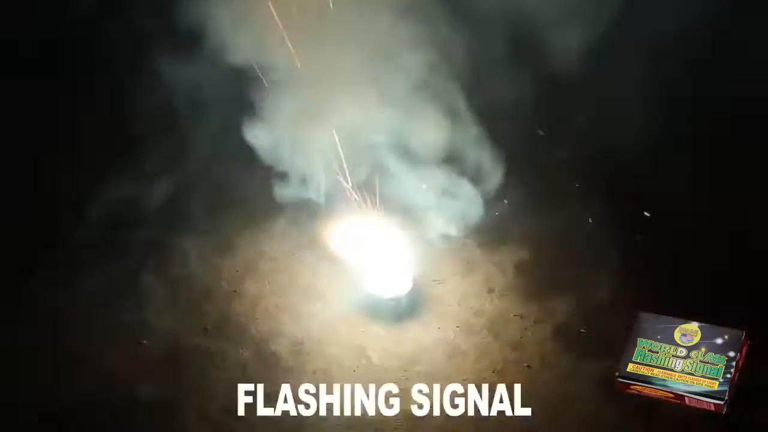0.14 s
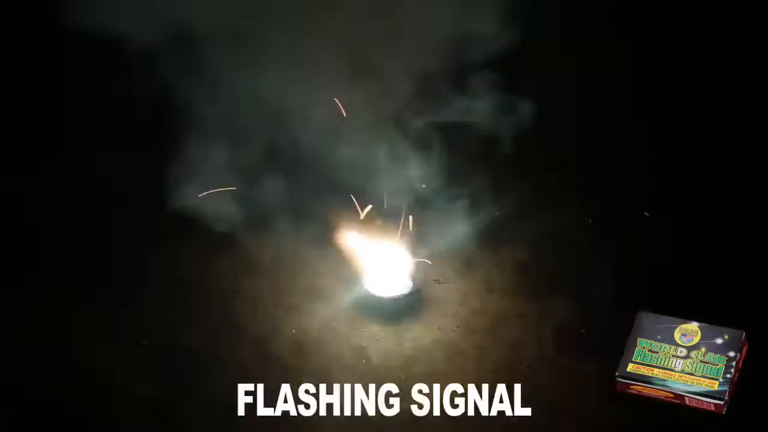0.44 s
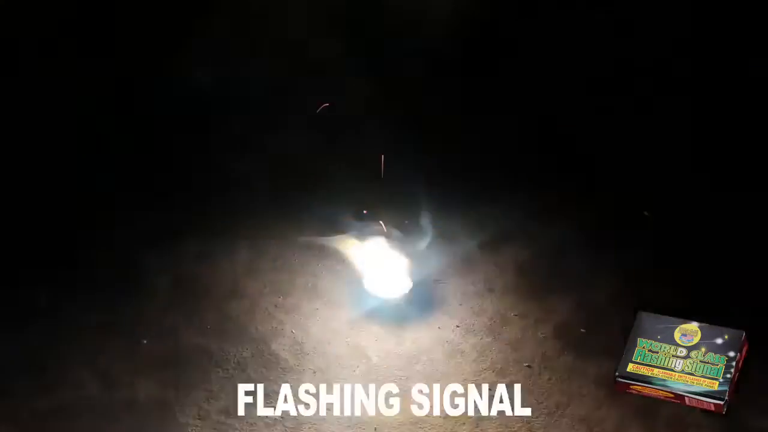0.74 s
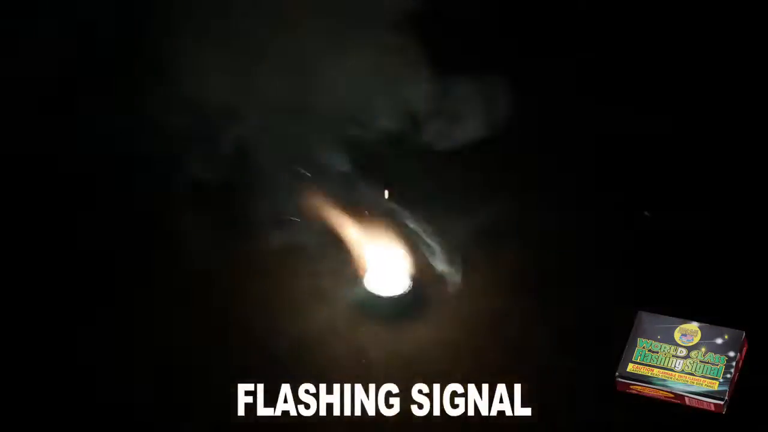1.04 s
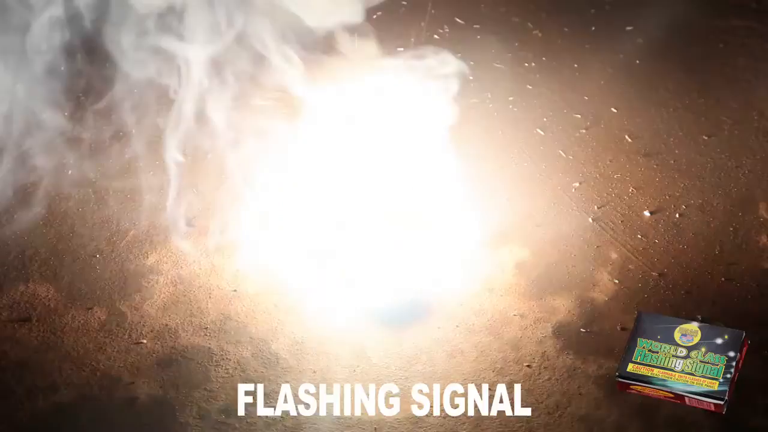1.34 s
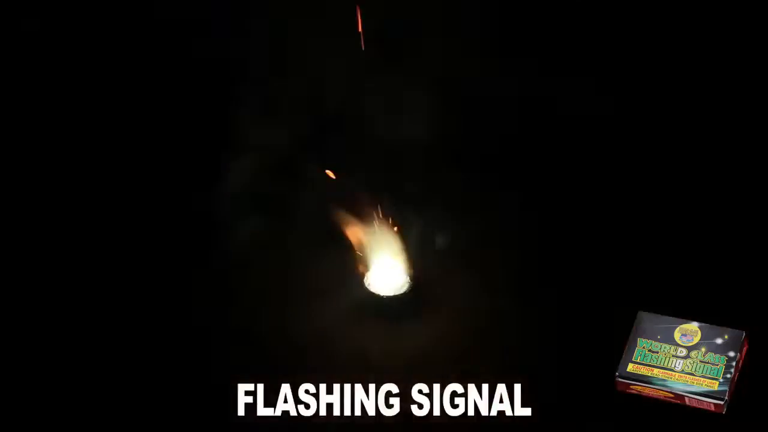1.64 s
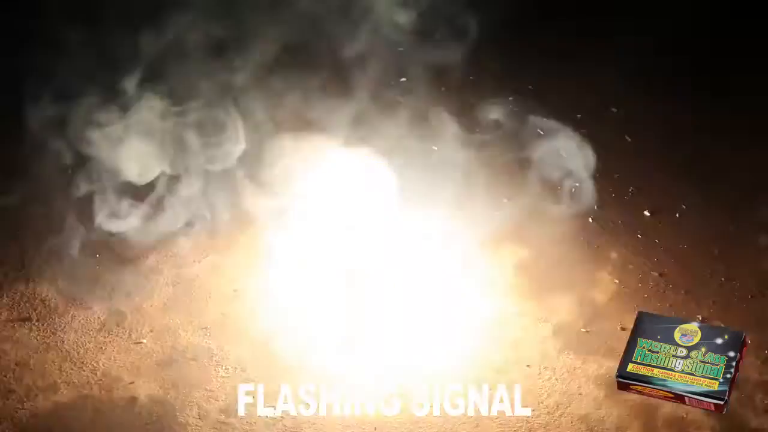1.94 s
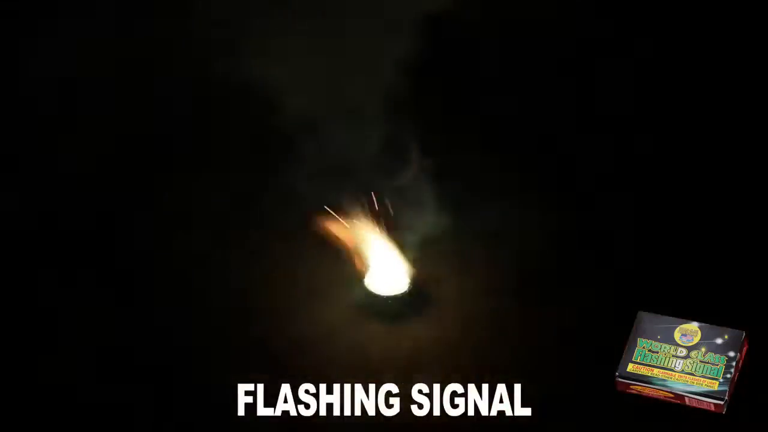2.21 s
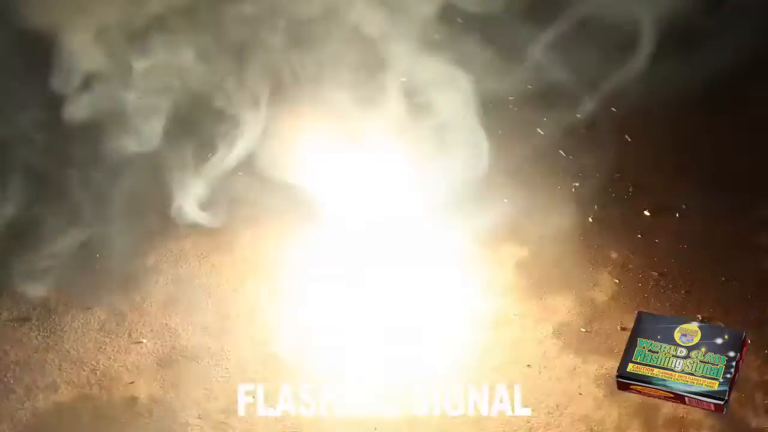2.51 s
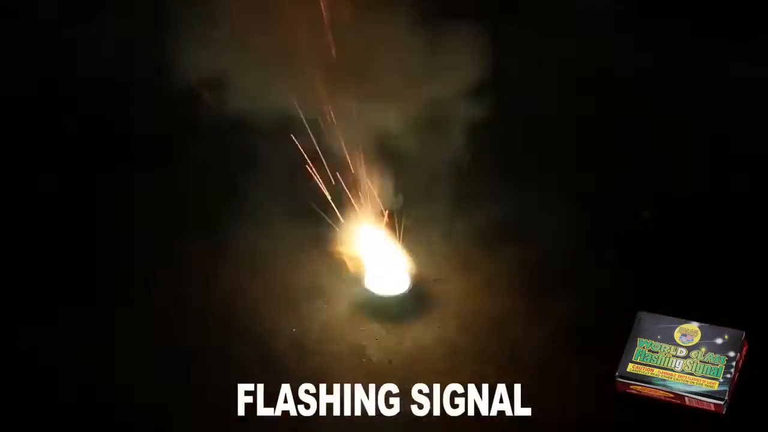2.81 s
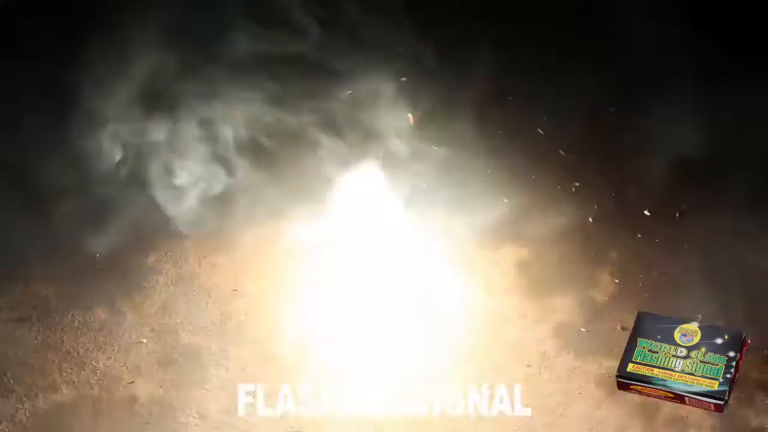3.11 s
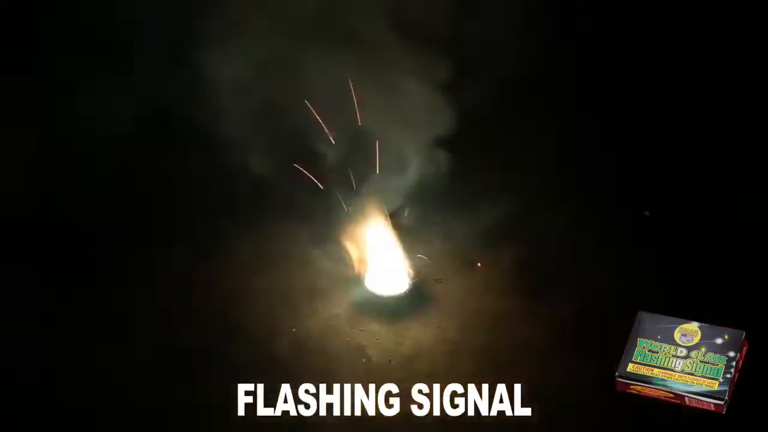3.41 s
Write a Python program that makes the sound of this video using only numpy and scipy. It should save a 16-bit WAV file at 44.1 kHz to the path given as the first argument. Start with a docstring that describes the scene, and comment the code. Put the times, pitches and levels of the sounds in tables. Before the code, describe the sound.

A ground firework strobes outdoors at night, a few metres away. From 0 to about 3.5 seconds, rough bursts of dense crackle come roughly every 0.2 seconds, with weaker ones between, mostly early on. Each swells briefly, thuds with a puff of air and dies into sizzle and short wall echoes. Sharp spark snaps stand out near 1.8 and 2.0 seconds; quiet flame hiss, fine ticks and faint low rumble fill the gaps.

```python
"""Strobing ground firework

A strobing ground firework burns outdoors at night, a few metres from the microphone.
Strong flashes come about five a second with weaker ones between: a swarm of tiny blasts swells, thuds and dies.
Each flash is a power curve over filtered random clicks, with a late hiss and a lingering sizzle on top.
Nearby walls return it as sparse echoes; pushes of air and spitting sparks are single-cycle pulses.
Below lie a quiet noisy flame with fine ticks, a lumpy rumble and a faint low sine hum."""
import sys
import numpy as np
from scipy import signal
from scipy.fft import rfft, irfft, next_fast_len
from scipy.io import wavfile
from scipy.ndimage import uniform_filter1d

SR = 44100
rng = np.random.default_rng(int(sys.argv[2]) if len(sys.argv) > 2 else 0)


def volts(x):
    """Linear amplitude factor 10**(x/20) for a level x in dB, scalar or array-like."""
    e = np.asarray(x, float) / 20
    return 10 ** e


def transcribe(u):
    """Save the signal u as a 16-bit wav file named by the first command-line argument.

    u: samples, shape (n,) or (channels, n), limited to [-1, 1]; the rate is SR.
    q: integer samples, one column per channel.
    """
    v = np.clip(np.atleast_2d(u).T, -1, 1)
    q = np.round(v * 32767).astype(np.int16)
    wavfile.write(sys.argv[1], SR, q)


N = 156555  # length [samples]


def evened(x):
    """Scales to rms 1."""
    return x / np.sqrt(np.mean(x ** 2) + 1e-20)


def read(points, hz):
    """Reads a table on a log-frequency axis."""
    f, value = np.transpose(points)
    return np.interp(np.log(hz + 1), np.log(f + 1), value)


def colour(x, points):
    """Causal minimum-phase filter with the given power spectrum, its taps scaled to unit energy."""
    hz = np.abs(np.fft.fftfreq(8192, 1 / SR))
    log_gain = np.log(volts(np.maximum(read(points, hz), -100)))
    phase = -signal.hilbert(log_gain).imag
    taps = np.fft.ifft(np.exp(log_gain + 1j * phase)).real[:4096]
    return signal.oaconvolve(x, taps / np.linalg.norm(taps))[:len(x)]


def swarm(per_s, spread_db, size):
    """Dense clicks of random sign and time; a few are large."""
    big = volts(spread_db * np.minimum(rng.exponential(1, size), 5))
    clicks = np.clip((per_s / SR - rng.random(size)) * SR / 200, 0, 1)  # zero where no click falls
    return evened(big * clicks * rng.choice([-1., 1.], size))


def wavelet(u):
    """One cycle: a swell of pressure and the suction after it, peak 1."""
    return -u * np.exp(.5 - .5 * u ** 2)


def wobble(db, size):
    """Quick random swell of a few ms, mean power 1."""
    return evened(volts(db * evened(uniform_filter1d(rng.standard_normal(size), size=130))))


def linger(power, fade_s):
    """Lets a power curve die away slowly, as a one-pole smoother."""
    keep = np.exp(-1 / (fade_s * SR))
    return signal.lfilter([1 - keep], [1, -keep], power)


def ragged(x):
    """Random patches about 1.5 kHz wide and 15 ms long swell or sink, so the treble sputters."""
    depth_db = 2.5
    z = signal.stft(x, nperseg=256, noverlap=192)[2]
    patches = uniform_filter1d(rng.standard_normal(z.shape), size=9, axis=0)
    patches = uniform_filter1d(patches, size=10, axis=1)
    gain = evened(volts(depth_db * evened(patches)))
    return signal.istft(z * gain, nperseg=256, noverlap=192)[1][:len(x)]


# Sizes of blast, small ones higher: (centre [Hz])
BLAST_CENTRES = [250, 420, 700, 1150, 1900, 3100]


def blasts(size):
    """One swarm for each size of blast, so each rings for a cycle or two at its own pitch."""
    per_s_at_1khz, spread_db, ring_octaves = 1509, 3.0, 0.38  # small blasts come faster
    hz = np.fft.rfftfreq(size, 1 / SR) + 1
    octaves_off = np.log2(hz[None] / np.array(BLAST_CENTRES)[:, None])
    bells = np.exp(-(octaves_off / ring_octaves) ** 2) + 1e-9
    spectrum = 0
    for centre, bell in zip(BLAST_CENTRES, bells / bells.sum(0)):
        clicks = swarm(per_s_at_1khz * centre / 1000, spread_db, size)
        spectrum = spectrum + np.sqrt(bell) * rfft(clicks)
    return irfft(spectrum, size)


# Flashes of the charge: (ignition [s], climb [s], hold [s], roar at ignition [dB], roar at hold [dB],
# thud at hold [dB], hiss at hold [dB])
FLASH_EVENTS = [(-.085, 0.031, 0.018, -21, -17, -26, -29.5), (0.114, 0.03, 0.032, -43, -20, -25, -31.5),
                (0.28, 0.014, 0.04, -38, -26.5, -33.5, -39), (0.367, 0.037, 0.0071, -27, -15, -19, -29.5),
                (0.417, 0.017, 0.014, -21.5, -29.5, -41, -39),
                (0.628, 0.017, 0.013, -31.5, -15, -19.5, -28),
                (0.832, 0.025, 0.0098, -32.5, -15.5, -23, -31),
                (0.884, 0.0092, 0.012, -38, -28.5, -38, -38), (1.004, 0.028, 0.018, -33, -17, -24, -30),
                (1.226, 0.011, 0.024, -19.5, -18, -24.5, -31.5),
                (1.378, 0.047, 0.0085, -31, -17, -19.5, -29), (1.445, 0.0025, 0.031, -38, -28, -34, -42.5),
                (1.618, 0.029, 0.0066, -39, -15, -25.5, -30), (1.827, 0.03, 0.0031, -28, -15.5, -22, -29.5),
                (2.011, 0.029, 0.008, -30, -16, -25, -29.5), (2.205, 0.028, 0.0087, -33, -16.5, -23.5, -28),
                (2.389, 0.02, 0.032, -34, -19.5, -25, -31), (2.556, 0.043, 0.029, -35, -19, -28, -31.5),
                (2.746, 0.0069, 0.0033, -37, -32, -40, -47),
                (2.822, 0.015, 0.011, -38.5, -16.5, -19.5, -28.5),
                (3.006, 0.026, 0.011, -33, -17, -23, -30),
                (3.184, 0.023, 0.017, -37.5, -18.5, -19.5, -29.5),
                (3.252, 0.0043, 0.0046, -44, -38, -42, -47),
                (3.345, 0.058, 0.0086, -35, -15.5, -23.5, -29.5)]


def flash_powers(t):
    """Each flash catches, climbs, holds and dies; thud and treble follow a little late."""
    catch_db_per_s, fall_db_per_s, treble_fall_db_per_s = 1800, 1319, 800  # before each layer's steepness
    thud_late_s, treble_late_s = 0.0019, 0.00074
    thud_steep, hiss_steep, sizzle_steep = 0.99, 1.21, 1.02  # how sharply each follows the flash
    roar_power, thud_power, hiss_power, sizzle_power = np.zeros((4, len(t)))
    for start, climb, hold, first_db, peak_db, thud_db, hiss_db in FLASH_EVENTS:
        def shape_db(late_s, fall):
            u = t - start - late_s
            rise = (first_db - peak_db) * (1 - np.clip(u / max(climb, 1e-3), 0, 1))
            return rise + catch_db_per_s * np.minimum(u, 0) - fall * np.maximum(u - climb - hold, 0)
        treble_shape = shape_db(treble_late_s, treble_fall_db_per_s)
        roar_power += volts(peak_db + shape_db(0, fall_db_per_s)) ** 2
        thud_power += volts(thud_db + thud_steep * shape_db(thud_late_s, fall_db_per_s)) ** 2
        hiss_power += volts(hiss_db + hiss_steep * treble_shape) ** 2
        sizzle_power += volts(hiss_db + sizzle_steep * treble_shape) ** 2
    return roar_power, thud_power, hiss_power, sizzle_power


# Spectrum of the roar: (frequency [Hz], level per hertz [dB])
ROAR_COLOUR = [(88, -44), (150, -8.5), (498, 2.5), (869, 0), (1130, -2.5), (1820, -1), (3220, -11.5),
               (3500, -18.5), (4200, -20), (5460, -100)]


def roar(pops, power):
    """The body of a flash: the swarm of blasts, mostly in the middle range."""
    return colour(pops * np.sqrt(power), ROAR_COLOUR)


# Spectrum of the thud: (frequency [Hz], level per hertz [dB])
THUD_COLOUR = [(30, -16.5), (80, -11), (160, -4.5), (300, -2), (600, -7), (1200, -43.5)]


def thud(pops, power):
    """The same blasts kept to their bass."""
    return colour(pops * np.sqrt(power), THUD_COLOUR)


# Spectrum of the hiss: (frequency [Hz], level per hertz [dB])
HISS_COLOUR = [(2500, -27.5), (3400, -1.5), (4100, -2.5), (4900, 2.5), (5800, -2.5), (6500, -1),
               (7200, -11), (9000, -16), (16000, -50)]


def hiss(power, flutter):
    """A jet of very dense clicks in the treble, fluttering with the blasts."""
    jet = swarm(14980, 3.25, len(power)) * flutter
    return colour(jet * np.sqrt(power), HISS_COLOUR)


# Spectrum of the sizzle: (frequency [Hz], level per hertz [dB])
SIZZLE_COLOUR = [(6000, -39), (7300, -1), (8800, -5), (10500, -2), (11800, -4), (13000, -5.5), (15800, -10)]
# Slow change of the sizzle over its base level: (time [s], level [dB])
SIZZLE_DRIFT = [(0, -0.1), (1.2, -0.8), (1.9, 4.5), (2.5, -1), (3.55, 2.2)]


def sizzle(sizzle_power, hiss_power, flutter, t):
    """Top treble of dense clicks that lingers after a flash, with a weaker, longer glow."""
    base_db, fade_s, glow_db, glow_fade_s = -10, 0.0028, -8.5, 0.02
    power = linger(sizzle_power, fade_s) + volts(glow_db) ** 2 * linger(hiss_power, glow_fade_s)
    crackle = swarm(15000, 2.5, len(t))
    level = volts(base_db + np.interp(t, *np.transpose(SIZZLE_DRIFT)))
    return colour(level * np.sqrt(power) * crackle * flutter, SIZZLE_COLOUR)


def flashes(t):
    """One fluttering fire drives roar and thud from shared blasts, and a sputtering treble."""
    roar_power, thud_power, hiss_power, sizzle_power = flash_powers(t)
    flutter = wobble(1.5, len(t))  # depth in dB
    pops = blasts(len(t)) * flutter
    treble = ragged(sizzle(sizzle_power, hiss_power, flutter, t) + hiss(hiss_power, flutter))
    return roar(pops, roar_power) + thud(pops, thud_power) + treble


# Decay of the echoes: (frequency [Hz], time to fall 60 dB [s])
WALL_DECAY = [(200, 0.44), (1500, 0.55), (4500, 0.51), (12000, 0.27)]
# Tone of the echoes: (frequency [Hz], level [dB])
WALL_TONE = [(100, 6.5), (500, -5.5), (1500, -4), (3500, 5), (5200, 7), (8000, 7), (14000, 2.5)]


def walls(x):
    """Sparse echoes of random sign, each band dying at its own speed."""
    level_db, first_echo_s, onset_s = -12.5, 0.018, 0.0034
    taps = np.zeros(SR)
    at = np.arange(0, SR - 20, 20) + rng.integers(0, 20, (SR - 1) // 20)  # one echo in every 20 samples
    taps[at] = rng.choice([-1., 1.], at.shape) * np.clip((at / SR - first_echo_s) / onset_s, 0, 1)
    hz, t, z = signal.stft(taps, SR, nperseg=256)
    decay = volts(-60 * t / read(WALL_DECAY, hz)[:, None])
    tail = signal.istft(z * decay, SR, nperseg=256)[1]
    echoes = colour(tail / np.linalg.norm(tail), WALL_TONE)
    return volts(level_db) * signal.fftconvolve(x, echoes)[:len(x)]


# Spectrum of the flame and the night air: (frequency [Hz], level per hertz [dB])
FLAME_COLOUR = [(65, -28), (110, -6), (967, -0.5), (1880, -6), (3490, -18.5), (5280, -19), (8000, -23.5),
                (15500, -28.5)]


def flame():
    """The steady burn between flashes and the night air: even hiss with fine ticks in it."""
    level_db, ticks_db, patch_db = -42, -8.5, 2.8  # ticks relative to the hiss
    frames, hz = N // 256 + 5, np.fft.rfftfreq(1024, 1 / SR)
    real, imag, patches = rng.standard_normal((frames, 513, 3)).T
    patches = uniform_filter1d(uniform_filter1d(patches, size=8, axis=0), size=4, axis=1)
    gain = volts(read(FLAME_COLOUR, hz)[:, None] + patch_db * evened(patches))
    burn = signal.istft((real + 1j * imag) * gain, nperseg=1024, noverlap=768)[1][:N]
    ticks = np.diff(colour(swarm(900, 3.6, N + 1), FLAME_COLOUR))  # differencing sharpens them
    ticks = colour(ticks, [(2500, 0), (9000, -40)])
    return volts(level_db) * (evened(burn) + volts(ticks_db) * evened(ticks))


# Low flutter of the flame, before its random lumps: (time [s], level [dB])
RUMBLE_LEVEL = [(0, -60), (1.42, -51), (2.06, -56.5), (2.6, -54), (3.55, -51)]


def rumble():
    """Bass noise whose level swells and sinks at random."""
    lump_db = 3.0
    low = colour(rng.standard_normal(N), [(20, -10), (50, 2.5), (95, -2.0), (180, -7), (500, -97)])
    lumps = evened(uniform_filter1d(rng.standard_normal(N), size=3000))
    level_db = np.interp(np.arange(N) / SR, *np.transpose(RUMBLE_LEVEL))
    return evened(low) * volts(level_db + lump_db * lumps)


# Low shoves of air as a flash ends: (time [s], peak level [dB])
PUSH_EVENTS = [(0.173, -29), (0.408, -25), (0.656, -29), (0.871, -21), (1.046, -38), (1.255, -22.5),
               (1.433, -26), (1.656, -15.5), (1.864, -22.5), (2.049, -24.5), (2.243, -24.5), (2.62, -26.5),
               (2.849, -25), (3.051, -25), (3.41, -36)]


def pushes(t):
    """Each shove is one slow cycle, its two peaks 1.3 ms either side of the middle."""
    return sum(volts(db) * wavelet((t - s) / 0.0013) for s, db in PUSH_EVENTS)


# Single sparks, level without the sharp edge: (time [s], peak level [dB], pitch [Hz])
SPIT_EVENTS = [(0.3723, -24, 700), (0.5124, -23.5, 1120), (0.6036, -25, 1220), (.767, -31, 1210),
               (0.798, -26, 1200), (0.5842, -30, 2020), (.962, -26, 1300), (1.013, -28, 1200),
               (1.381, -26, 1200), (1.7906, -19.5, 1160), (1.826, -15, 980), (1.9955, -21, 696),
               (2.5588, -30, 1200), (3.3495, -22, 1500)]


def spits(t):
    """Single sparks burst as one quick cycle, sharpened by a weaker one at three times the pitch."""
    edge_db = -12
    out, u = np.zeros(len(t) + 200), np.arange(-100, 100) / SR
    for s, db, hz in SPIT_EVENTS:
        at = min(round((s - t[0]) * SR) - 100, len(t))
        burst = wavelet(2 * np.pi * hz * u)
        edge = wavelet(6 * np.pi * hz * u)
        out[at:at + 200] += volts(db) * (burst + volts(edge_db) * edge)
    return out[:len(t)]


# Swell of the hum: (time [s], rms level [dB])
HUM_LEVEL = [(1.95, -81), (2.15, -49.5), (2.8, -49.5), (3.3, -48.5), (3.45, -66)]


def hum(t):
    """A faint low sine of steady pitch comes and goes."""
    hz = 173
    level = volts(np.interp(t, *np.transpose(HUM_LEVEL)))
    return np.sqrt(2) * level * np.sin(2 * np.pi * hz * t)


def scene():
    """The firework with its echoes, pushes and hum, over flame and rumble."""
    lead = 8820  # samples run in ahead, so echoes already sound at the start
    t = np.arange(-lead, next_fast_len(N + lead) - lead) / SR
    fire = flashes(t) + spits(t)
    air = fire + walls(fire) + pushes(t) + hum(t)
    return (air[lead:lead + N] + flame() + rumble())[None]


def top_cut(x):
    """Nothing passes above the cut-off."""
    return signal.sosfilt(signal.butter(12, 15890, fs=SR, output="sos"), x)


def record(dry):
    """The microphone rolls off the bass, and a steep low-pass limits the band."""
    low_hz, top_hz = 37.2, 15780
    mix = signal.lfilter(*signal.butter(2, low_hz, "high", fs=SR), dry)
    low_pass = signal.firwin(1023, top_hz, window=("kaiser", 9), fs=SR)
    mix = signal.oaconvolve(mix, low_pass[None], "same")
    return top_cut(mix)


dry = scene()
out = record(dry)
transcribe(out)
```